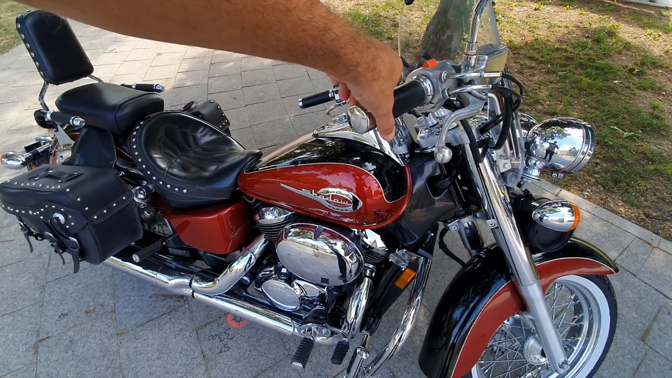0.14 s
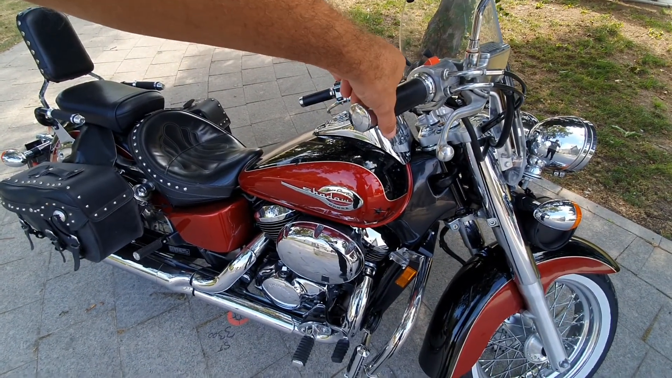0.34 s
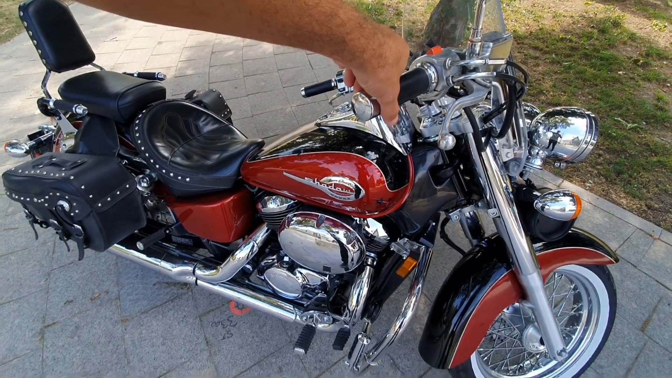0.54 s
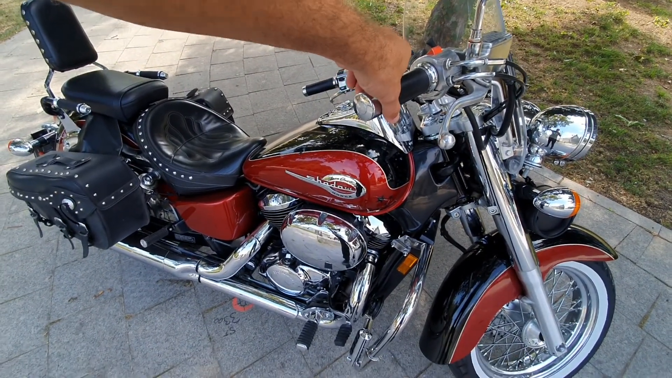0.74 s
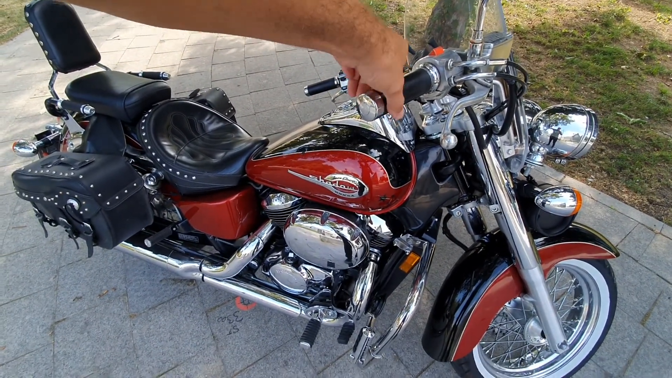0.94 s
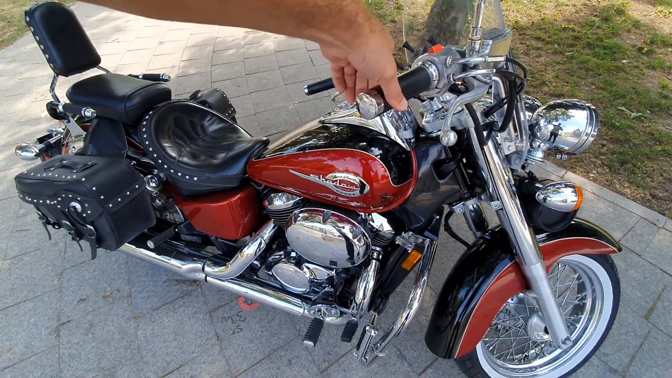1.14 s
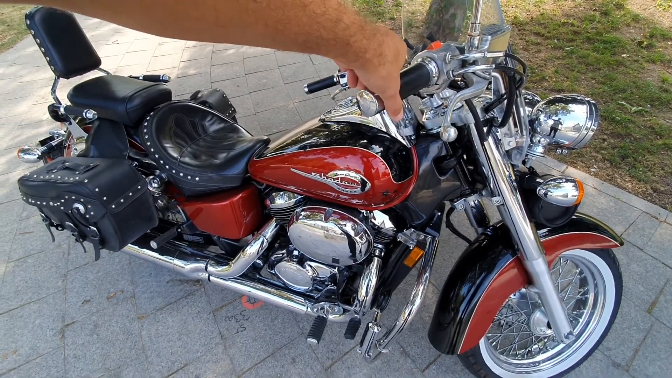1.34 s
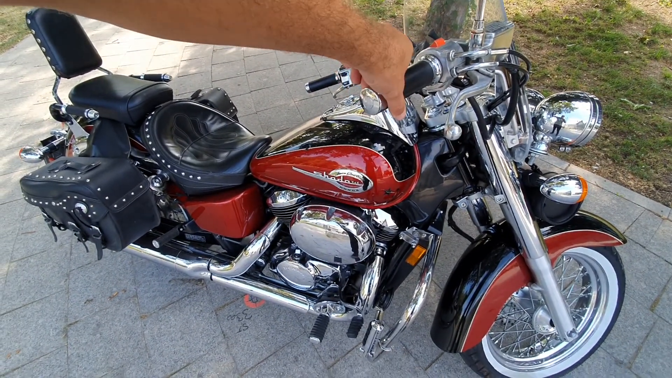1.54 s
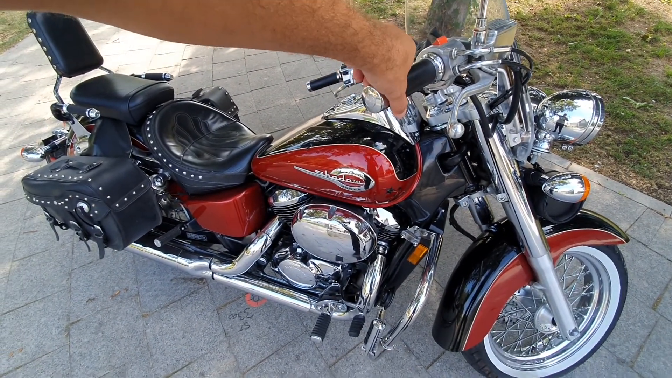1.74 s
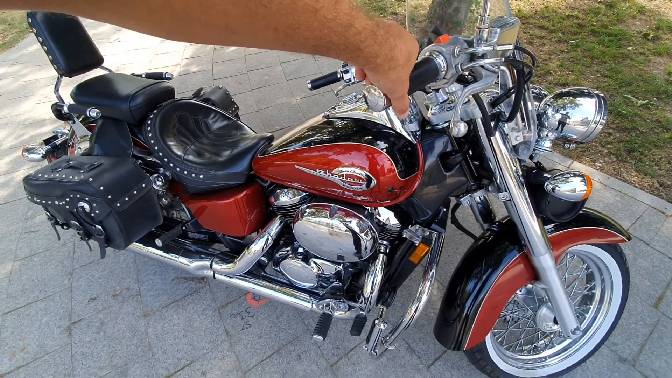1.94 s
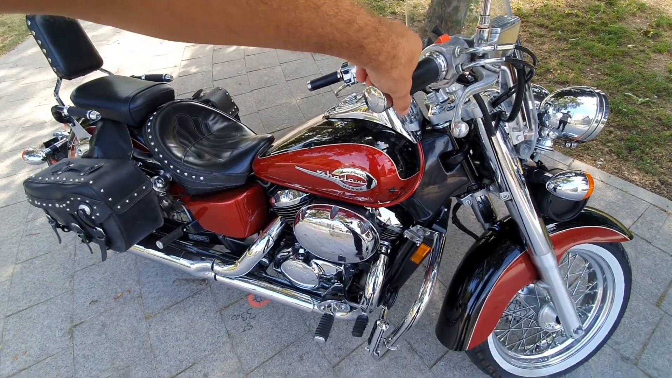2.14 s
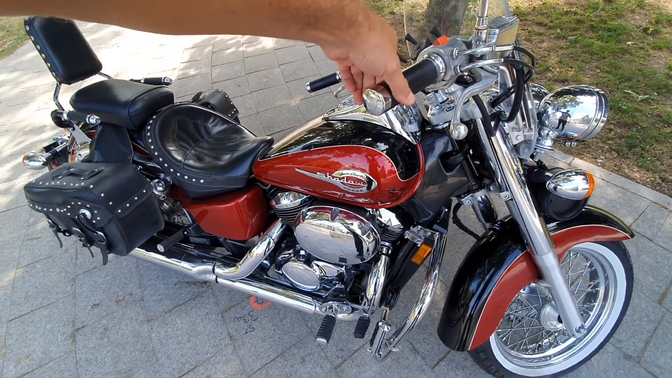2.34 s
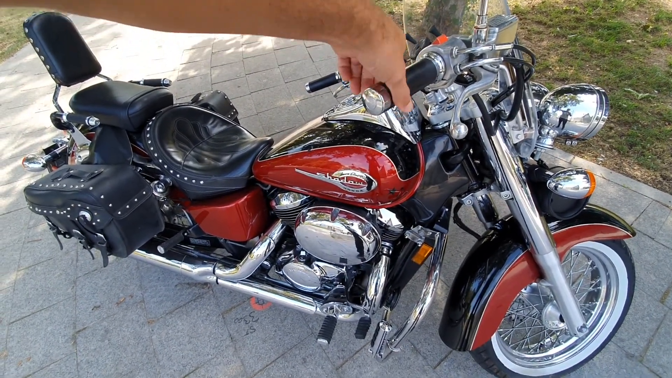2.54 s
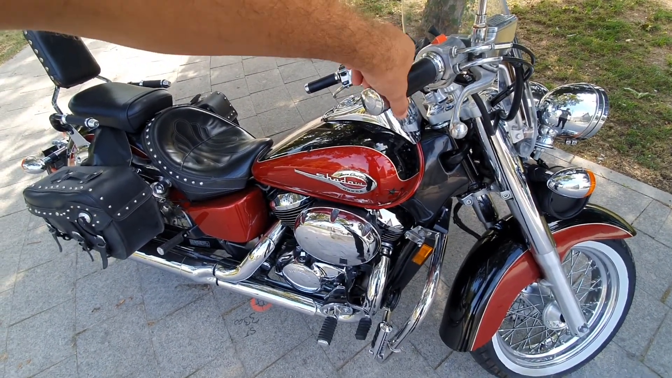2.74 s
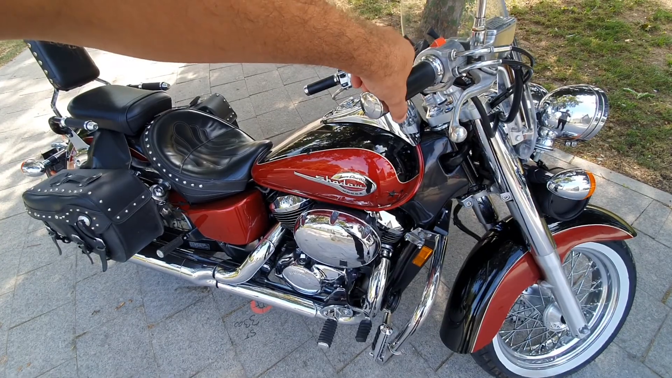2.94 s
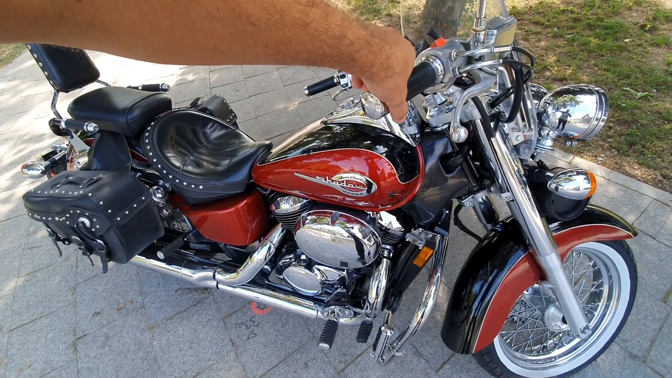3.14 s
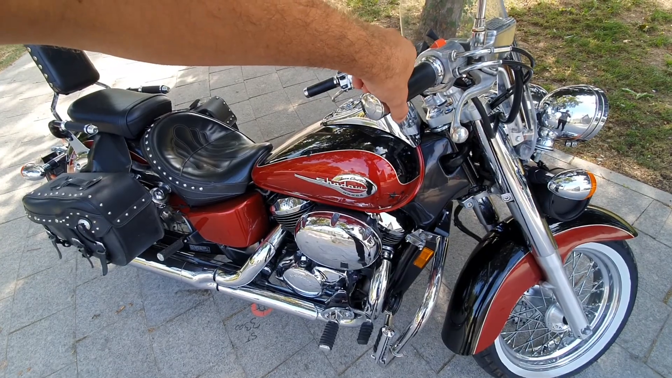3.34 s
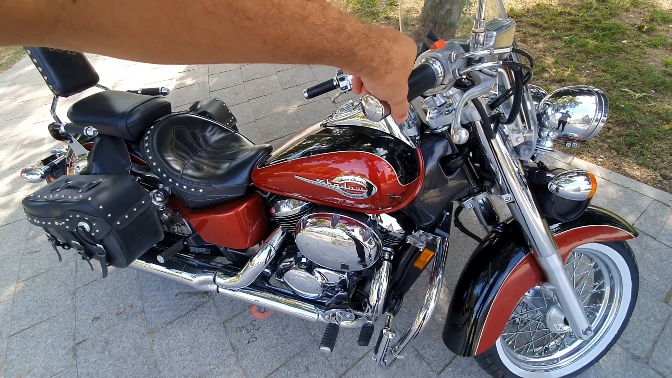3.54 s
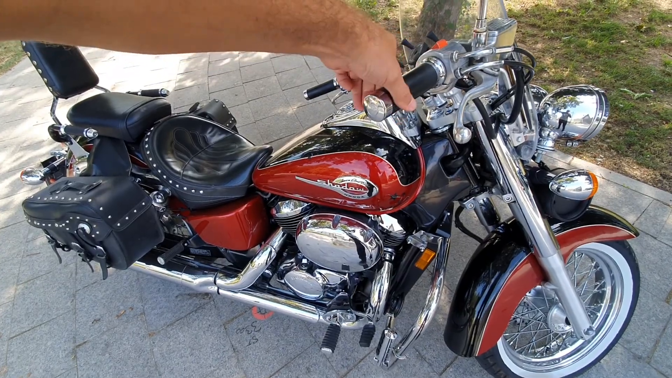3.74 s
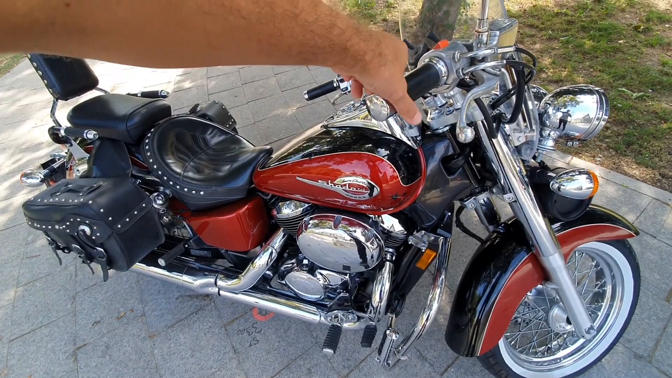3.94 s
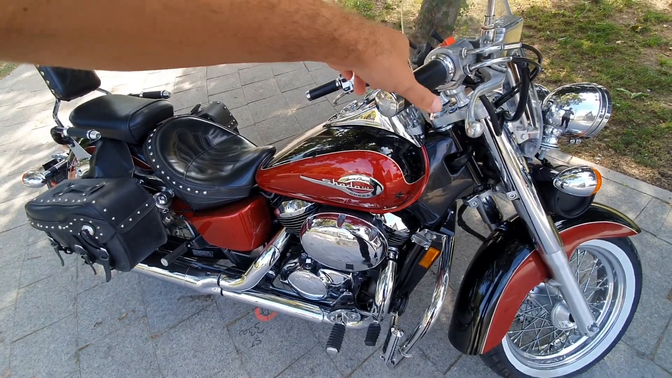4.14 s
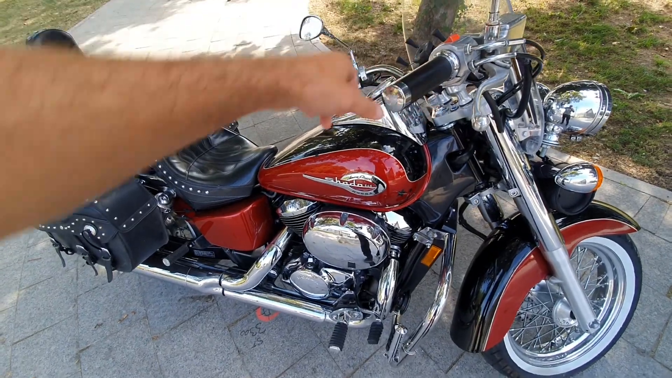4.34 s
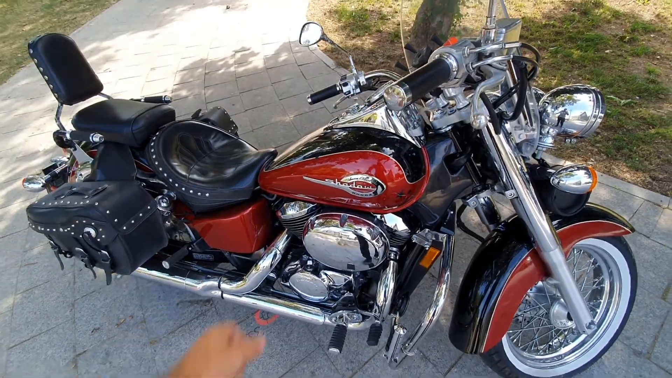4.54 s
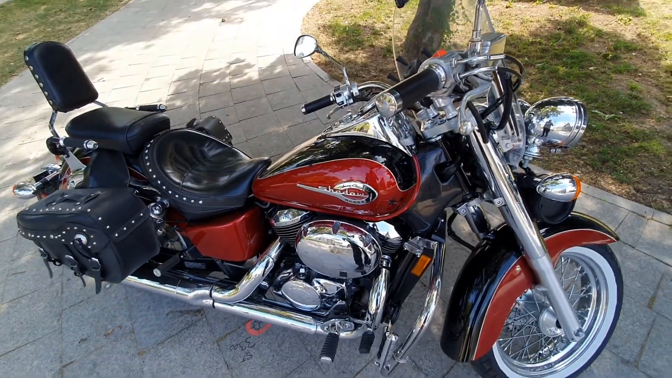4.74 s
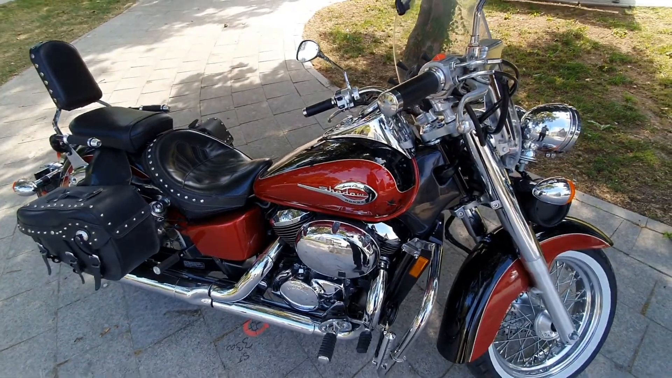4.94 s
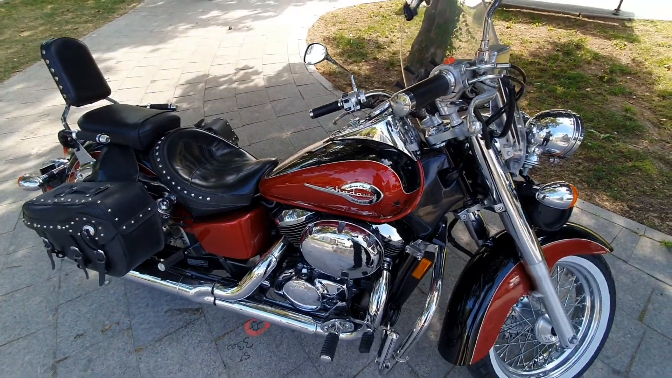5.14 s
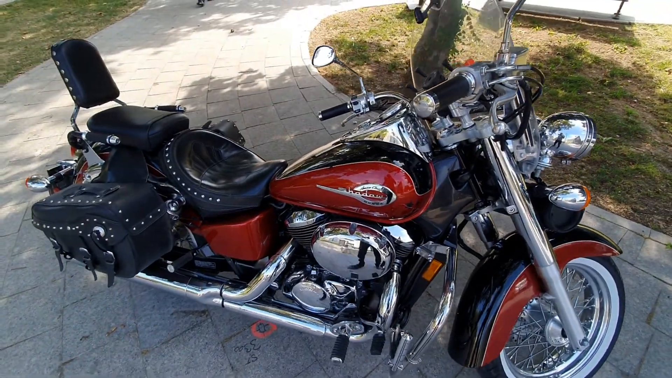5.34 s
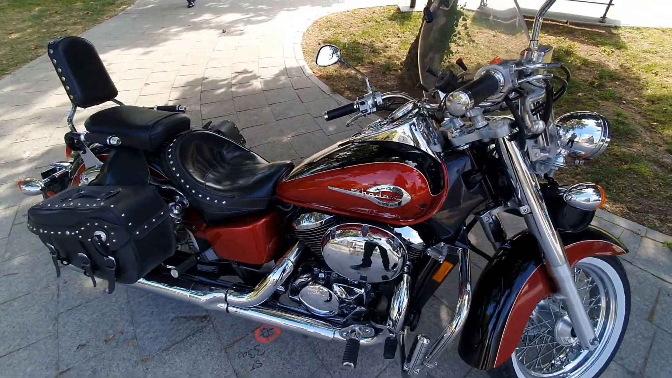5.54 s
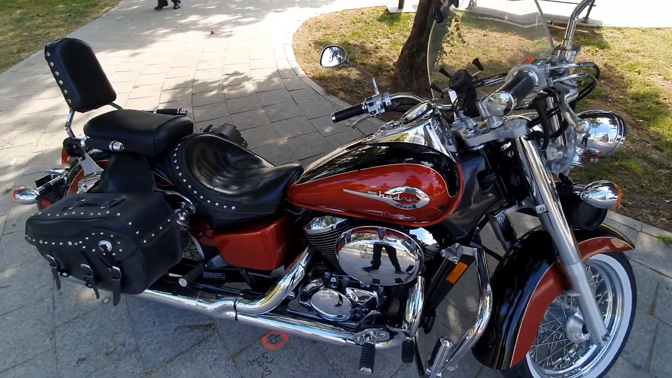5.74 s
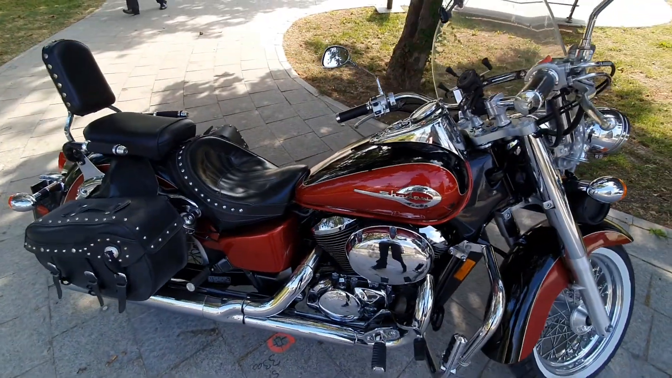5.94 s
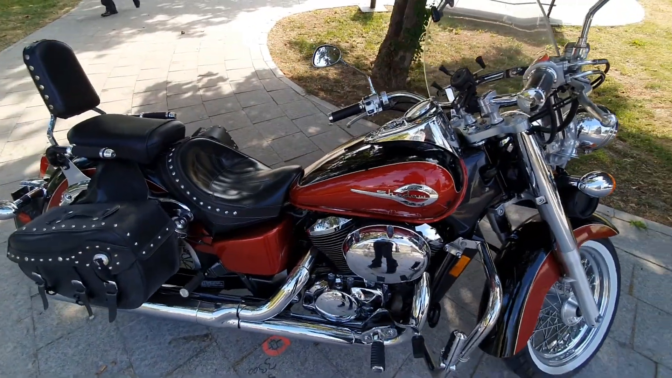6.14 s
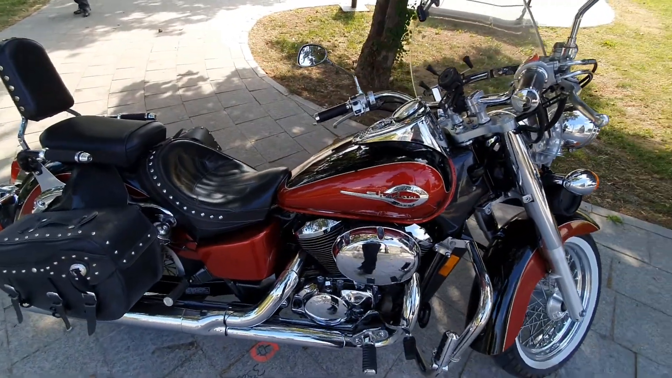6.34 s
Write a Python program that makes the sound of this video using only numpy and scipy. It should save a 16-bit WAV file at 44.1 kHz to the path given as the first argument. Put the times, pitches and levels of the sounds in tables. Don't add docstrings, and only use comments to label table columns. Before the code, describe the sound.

Close beside a parked cruiser motorcycle on outdoor paving, its twin-cylinder engine idles in slow uneven thumps with light metallic valve rattle and faint gear whine. The throttle is blipped three times; each blip gulps air, climbs to a harsh bark and drops back to a stumbling idle. Finally the handheld stereo microphone moves towards the pipes and the exhaust grows louder.

```python
import sys
import numpy as np
from scipy import signal
from scipy.fft import rfft, irfft, next_fast_len
from scipy.io import wavfile
from scipy.ndimage import uniform_filter1d, map_coordinates

SR = 44100
rng = np.random.default_rng(int(sys.argv[2]) if len(sys.argv) > 2 else 0)


def elevation(decibels):
    levels = np.asarray(decibels, float)
    return 10 ** (levels / 20)


def store_pcm(level_fs):
    pcm = np.round(np.clip(level_fs, -1, 1) * 32767).astype(np.int16)
    wavfile.write(sys.argv[1], SR, np.atleast_2d(pcm).T)


N = 285752
TIME_S = np.arange(N) / SR


def unit(x):
    return x / np.sqrt(np.mean(x ** 2) + 1e-20)


def along(points, hz):
    f, v = np.transpose(points)
    return np.interp(np.log(hz + 1), np.log(f + 1), v)


def curves(rows, x):
    knots, *cols = np.transpose(rows)
    return [np.interp(x, knots, c) for c in cols]


def wobble(rate_hz):
    knots = rng.standard_normal(int(N * rate_hz / SR) + 4)
    return map_coordinates(knots, [np.arange(N) * rate_hz / SR])


def filtered(x, response):
    m = next_fast_len(N + 8192)
    return irfft(rfft(x, m) * response(np.fft.rfftfreq(m, 1 / SR)), m)[..., :N]


def hiss(spectrum, modes=()):
    def response(f):
        boost = 1 + sum(elevation(db) / (1 + ((f - hz) / (w / 2)) ** 2) for hz, w, db in modes)
        return elevation(along(spectrum, f)) * boost
    return unit(filtered(rng.standard_normal((2, N)), response))


def scatter(s, rows):
    at = np.round(s * SR).astype(int)[:, None] + np.arange(rows.shape[1])
    return np.bincount(at.ravel(), rows.ravel(), N + rows.shape[1])[:N]


def puffs(s, size_db, delay_s, rise_s, decay_s, steady):
    t = np.arange(SR // 10) / SR
    puff = (1 - np.exp(-t / rise_s)) * np.exp(-t / decay_s)
    gate = steady + scatter(s + delay_s, elevation(size_db)[:, None] * puff)
    power = uniform_filter1d(uniform_filter1d(gate ** 2, SR // 9), SR // 9)
    return gate / np.sqrt(np.abs(power))


def rung(s, modes, scatter_db, detune, rise_s):
    t, rows = np.arange(SR // 12) / SR, 0
    for hz, db, t60 in modes:
        tune, strength = rng.standard_normal((len(s), 2)).T[:, :, None]
        decay = elevation(db + scatter_db * strength - 60 * t / t60)
        rows = rows + decay * np.sin(2 * np.pi * hz * (1 + detune * tune) * t)
    return rows * (1 - np.exp(-t / rise_s))


# time_s,
# rate_cycles_per_s (four-stroke)
IDLE = [(0.0, 11.359), (0.108, 11.802), (0.227, 7.89), (0.561, 7.219), (0.642, 7.515), (2.039, 6.916),
        (2.099, 6.498), (2.159, 7.253), (3.304, 6.997), (3.409, 7.741), (3.489, 6.942), (3.742, 7.378),
        (4.609, 7.442), (5.571, 7.257), (5.918, 7.017), (6.358, 7.749), (6.48, 7.552)]
BLIP_SHAPE = [(-1.0, 0.0), (-0.715, 0.269), (-0.451, 0.431), (0.0, 1.0), (0.197, 0.869), (0.349, 0.603),
              (0.439, 0.462), (0.705, 0.119), (1.0, 0.0)]
# top_s, gain_cycles_per_s, climb_s, fall_s
BLIPS = [
    (1.205, 16.057, 0.27, 0.855),
    (2.542, 19.643, 0.255, 0.982),
    (3.845, 17.715, 0.201, 0.911),
]


def speed(t):
    rate = curves(IDLE, t)[0]
    for top, gain, climb, fall in BLIPS:
        rate = rate + gain * curves(BLIP_SHAPE, (t - top) / np.where(t < top, climb, fall))[0]
    return rate


# start_s, gulp_db, length_s
GULPS = [
    (0.958, -35, 0.27),
    (2.292, -38, 0.29),
    (3.657, -36.5, 0.23),
]


def throttle(t):
    return sum(np.clip((t - start) / 0.034, 0, 1) * np.clip((start + length + 0.044 - t) / 0.08, 0, 1)
               for start, _, length in GULPS)


def law(shut, wide, t):
    rate, load = speed(t), throttle(t)
    return (1 - load) * np.array(curves(shut, rate)) + load * np.array(curves(wide, rate))


# time_s, way_round_to_pipes (0-1), pipes_near_db, cases_near_db
WALK = [(0, 0.3, 0, -0.5), (.8, 0, 1, 1), (2.1, .05, -1, -1), (3.4, 0.01, -0.5, 0), (4.2, 0.01, 0, 0.5),
        (4.6, 0.34, 1.5, -1.5), (5.1, 0.38, 0, -2.5), (5.6, 0.66, 6, 2.5), (5.85, 0.9, 9, 5.5),
        (6.48, 0.72, 9, 6.5)]


def walk(t):
    return curves(WALK, t)


# time_s, loss_db (negative = weaker)
MISFIRES = [(.194, -7), (.59, -31), (.931, 0.5), (1.249, -3.5), (1.267, -8.5), (1.915, -16), (2.625, -11),
            (3.151, -9), (3.631, 2), (3.917, -1), (4.422, -8), (4.563, -29), (5.082, -26)]
A_FRONT_FIRING_S, REAR_TURN_CYCLES = 6.1305, .42


def firings():
    cycles = np.cumsum(speed(TIME_S)) / SR
    cycles -= cycles[round(A_FRONT_FIRING_S * SR)]
    whole = np.arange(np.floor(cycles[0]), cycles[-1])
    due = np.sort(np.r_[whole, whole + REAR_TURN_CYCLES])
    due = due[(due > cycles[0]) & (due < cycles[-1])]
    s = np.interp(due, cycles, TIME_S)
    loss_db = sum(db * (abs(s - when) < .015) for when, db in MISFIRES)
    return s, (due % 1 > .1).astype(int), loss_db


# thump_db, rear_over_front_db, pitch_ratio
STUMBLE = (-4, 5, .24)
STUMBLE_S = .09


def stumble(s):
    near = sum(np.clip(1 - abs(s - start - length - .03) / STUMBLE_S, 0, 1) for start, _, length in GULPS)
    return np.outer(STUMBLE, near * (1 - throttle(s)))


def pipe_rings(s, rear, pipes, stretch):
    hz, turns, settle, rise, decay, lag = np.array(pipes)[rear].T[:, :, None]
    t = np.arange(SR // 8) / SR * stretch[:, None]
    swing = -np.sin(2 * np.pi * (hz * t + turns * (1 - np.exp(-t / settle))))
    ring = swing * (1 - np.exp(-t / rise)) * np.exp(-t / decay)
    return np.abs(s + lag[:, 0]), ring / np.abs(ring).max(axis=1, keepdims=True)


# rate_cycles_per_s, thump_db, rear_over_front_db, pitch_ratio
PUSH_SHUT = [(7.4, -21, 2, 1.0), (8.5, -20, 1.5, .88), (11, -17, 0, .86), (14, -13, -1, .89),
             (17, -10, 1, .94), (20, -9.5, 3.5, 1.02), (23, -10, 4, 1.06), (26, -10.5, 4, 1.09)]
PUSH_OPEN = [(8, -10.5, 2, 1.03), (11, -9, 3, 1.05), (16, -8.5, 4.5, 1.12), (22, -10, 6, 1.25),
             (26, -10, 7.5, 1.38)]
# ring_hz, extra_turns, settle_s, rise_s, decay_s, lag_s
COOL_PIPES = [
    (57, .55, .0093, .01, .019, .0011),
    (35, 1.5, .015, .015, .008, -.0003),
]
HOT_PIPES = [
    (80, .83, .0015, .015, .0115, -.0032),
    (88, .1, .001, .015, .006, -.0014),
]
# mode_hz, level_db, t60_s
KNOCKS = [(183.5, -14, 0.083), (210, -17.5, 0.088), (355, -9, 0.036), (435, -25, 0.053)]
BARK = [(270, -5, .03), (190, -10, .025), (420, -12, .02)]
BARK_SHUT_DB, BARK_DB_PER_CYCLE = -4.5, 1.2


def thumps(s, rear, loss_db):
    push_db, rear_db, pitch = law(PUSH_SHUT, PUSH_OPEN, s) + stumble(s)
    heat = np.clip((speed(s) - 8.5) / 6, 0, 1)
    luck_db = .5 * rng.standard_normal(len(s))
    size = elevation(push_db + walk(s)[1] + rear * rear_db + loss_db + 1.5 + luck_db)
    knocks = rung(s, KNOCKS, scatter_db=3.5, detune=0.082, rise_s=0.0045)
    out = scatter(s + 0.004, (size * elevation(-5 * heat))[:, None] * knocks)
    bark = elevation(BARK_SHUT_DB * (0.5 - throttle(s)) + BARK_DB_PER_CYCLE * (speed(s) - 28))
    headers = rung(s, BARK, scatter_db=2.5, detune=0.031, rise_s=0.001)
    out = out + scatter(s + 0.0011, (size * bark)[:, None] * headers)
    for pipes, share in (COOL_PIPES, 1 - heat), (HOT_PIPES, heat):
        start, rings = pipe_rings(s, rear, pipes, pitch)
        out = out + scatter(start, (size * share)[:, None] * rings)
    return out


# rate_cycles_per_s, spit_db, rattle_db
NOISE_SHUT = [(7.23, -58.5, -44), (9, -53, -44), (11.66, -48, -39.5), (16, -40.5, -36.5),
              (20.2, -38.5, -34), (24.9, -37.5, -29.5)]
NOISE_OPEN = [(7.85, -35, -32), (10.95, -31.5, -36), (16.7, -24.5, -30), (19.7, -27.5, -29.5),
              (25.7, -28.5, -27)]
# rate_cycles_per_s, rasp_db
RASP_SHUT = [(7.4, -41), (9, -36), (11, -32), (15, -33), (20, -30), (26, -23)]
RASP_OPEN = [(8, -32), (11, -28), (16, -24), (20, -21), (26, -17)]


def noise_db(t):
    _, pipes_db, cases_db = walk(t)
    spit_db, rattle_db = law(NOISE_SHUT, NOISE_OPEN, t)
    rasp_db = law(RASP_SHUT, RASP_OPEN, t)[0]
    return spit_db + pipes_db, rasp_db + pipes_db, rattle_db + cases_db


# freq_hz, density_db
SPIT = [(350, -20), (600, 6), (698, -54), (811, 7), (1110, 4), (1730, -13.5), (2210, -38), (2790, -6),
        (3340, -1), (3880, -2), (4510, 0), (6450, -3), (7600, -10.5), (12000, -11), (16000, -17)]
RASP = [(65, -6), (110, -2), (151, -11.5), (215, -4), (270, -8), (383, -11), (482, -20.5), (580, -29.5),
        (900, -31), (1170, -106), (1980, -120)]
# mode_hz, width_hz, boost_db
TAILPIPE = [(1090, 450, -30), (3280, 580, -1), (4380, 100, -4), (6730, 140, 2)]
# mode_hz, level_db, t60_s
PINGS = [(863, -5.5, 0.02), (1076, -1, 0.017), (3240, 2.5, 0.021), (4280, -35, 0.02), (4380, -34, 0.0058),
         (5280, -8, 0.018), (6330, -17, 0.025)]


def gas(s, rear, loss_db):
    spit_db, rasp_db, _ = noise_db(TIME_S)
    luck = rng.standard_normal((len(s), 2))
    load = throttle(s)
    blast_db = loss_db + 9 * load + 7 * rear * load + 2.5 * luck[:, 0]
    spit = puffs(s, blast_db, delay_s=.0005, rise_s=.006, decay_s=.0038, steady=.075)
    flow_db = loss_db + 3 * load + 1.7 * luck[:, 1]
    rasp = puffs(s, flow_db, delay_s=0, rise_s=0.0025, decay_s=0.0042, steady=0.25)
    ping_db = noise_db(s)[0] + loss_db + 6 * rear + 10 + 1.5 * load
    rings = rung(s, PINGS, scatter_db=3, detune=.05, rise_s=.002)
    pings = scatter(s + .003, elevation(ping_db)[:, None] * rings)
    bursts = elevation(spit_db + 2.5) * spit * hiss(SPIT, TAILPIPE)
    return bursts + elevation(rasp_db - 2) * rasp * hiss(RASP) + pings * [[1], [.4]]


GEAR_TEETH = 82


def gear_whine():
    mesh_hz = GEAR_TEETH * speed(TIME_S) + 65 * wobble(150)
    mesh = np.sin(2 * np.pi * np.cumsum(mesh_hz) / SR)
    cover = lambda f: 1 / (1 + ((f - 2030) / 110) ** 2) + 0.034
    return filtered(elevation(-34 + 2.5 * wobble(50)) * mesh, cover)


# freq_hz, density_db
CASE = [(260, -34), (450, 4.5), (515, -10), (563, -4), (748, -22), (1120, -10), (1620, -14.5), (2320, -14),
        (2700, -14.5), (3480, -17), (6420, -24.5), (7450, -33), (12600, -32.5), (14200, -37.5),
        (16000, -51)]
REAR_SIDE = [(400, -73), (680, 0), (756, -3), (1600, 0), (1780, -13), (2060, -8), (2610, -9), (4040, -7.5),
             (6500, -12), (7620, -26), (12400, -26), (16000, -39)]
# mode_hz, width_hz, boost_db
FINS = [(2259, 26.5, 13), (2044, 20, 8.5), (1100, 6.7, 3), (2503, 36, 4.5)]
# mode_hz, level_db, t60_s
TAPPETS = [(4250, 4.5, 0.021), (4130, -6, 0.018), (5130, -11, 0.012), (6490, 7.5, 0.0085)]


def valve_gear(s):
    seat_s = np.r_[s - .002, (s[1:] + s[:-1]) / 2]
    luck_db = 3 * rng.standard_normal(len(seat_s))
    beat = puffs(seat_s, luck_db, delay_s=0, rise_s=.004, decay_s=.01, steady=.8)
    way = np.clip(walk(TIME_S)[0], 0, 1)
    pipe_end = hiss(REAR_SIDE, [(1950, 190, 1.4), (14000, 810, 1.5)])
    cases = np.sqrt(1 - way) * hiss(CASE, FINS) + np.sqrt(way) * pipe_end
    at_firing = np.arange(len(seat_s)) < len(s)
    tap_db = noise_db(seat_s)[2] - 4 + 7 * walk(seat_s)[0] + 7 * at_firing
    rings = rung(seat_s, TAPPETS, scatter_db=3.5, detune=.08, rise_s=.002)
    taps = scatter(np.abs(seat_s), elevation(tap_db)[:, None] * rings)
    rattle = elevation(noise_db(TIME_S)[2] + 0.89 * wobble(40)) * beat * cases
    return rattle + (gear_whine() + taps) * [[1], [.6]]


# freq_hz, density_db
INTAKE = [(100, 6.5), (300, 0), (1000, -1), (2200, 4), (3500, -1), (8000, -63), (16000, -46)]


def intake(s):
    mouth = 0
    for start, db, length in GULPS:
        opening = np.clip((TIME_S - start) / 0.012, 0, 1)
        closing = np.clip((start + length - TIME_S) / 0.07, 0, 1)
        mouth = mouth + elevation(db) * opening * closing
    strokes = (s[1:] + s[:-1]) / 2
    luck_db = 1.2 * rng.standard_normal(len(strokes))
    suck = puffs(strokes, luck_db, delay_s=0, rise_s=.003, decay_s=.014, steady=.35)
    return mouth * suck * elevation(1.8 * wobble(60)) * hiss(INTAKE, [(2280, 150, 1)])


# time_s, peak_db
TICKS = [
    (1.462, -39),
    (3.011, -47),
    (4.3324, -42),
]


def throttle_ticks():
    s, db = np.transpose(TICKS)
    t = np.arange(SR // 50) / SR
    metal = hiss([(600, -30), (1500, 17), (4000, 2), (16000, -22)])
    return scatter(s, elevation(db[:, None] - 60 * t / 0.011)) * metal


def paving_echo(thump):
    t = np.arange(SR // 5) / SR
    tail = rng.standard_normal((2, SR // 5)) * elevation(-60 * t / .3)
    return elevation(-21) * signal.fftconvolve(thump[None], tail / np.linalg.norm(tail[0]), axes=1)[:, :N]


# freq_hz, density_db
RUMBLE = [(25, -36), (50, 0), (90, 15), (200, 0.5), (500, -25), (900, -87)]


def yard_rumble():
    return elevation(-44 + 3.5 * wobble(5)) * hiss(RUMBLE)


# freq_hz, phase_between_ports_rad
LEAD = [(30, 0.054), (100, 0.24), (500, 0.52), (1100, 1.04), (2200, 0.39), (3400, 4.6), (7000, 2.7),
        (16000, 14.5)]
# freq_hz, left_right_likeness
ALIKE = [(100, 0.8), (500, 0.98), (1000, 0.8), (2000, 0.46), (4000, 0.17), (16000, 0.25)]
# freq_hz, left_over_right_db
TILT = [(60, 0), (180, .5), (550, .8), (1650, 0), (4970, -.9), (15000, .2)]


def ports(pair):
    turn = lambda f: np.arccos(np.clip(along(ALIKE, f), -1, 1)) / 2
    direct, spread = filtered(pair, lambda f: np.array([np.cos(turn(f)), np.sin(turn(f))]))
    half = lambda f: np.exp(.5j * along(LEAD, f)) * elevation(along(TILT, f) / 2)
    sides = np.array([direct + spread, direct - spread])
    return filtered(sides, lambda f: np.array([half(f), 1 / half(f)]))


def scene():
    s, rear, loss_db = firings()
    thump = thumps(s, rear, loss_db)
    engine = thump * [[1], [0]] + gas(s, rear, loss_db) + valve_gear(s) + intake(s) + throttle_ticks()
    return ports(engine + paving_echo(thump) + yard_rumble())


def top_cut(x):
    return signal.sosfilt(signal.butter(12, 16100, fs=SR, output="sos"), x)


def record(dry):
    cut = filtered(dry, lambda f: 1 / (1 + (33 / (f + 1)) ** 6))
    soft = cut / (1 + np.abs(cut / .97) ** 6) ** (1 / 6)
    mix = filtered(soft, lambda f: f < 15900)
    return top_cut(mix)


dry = scene()
out = record(dry)
store_pcm(out)
```